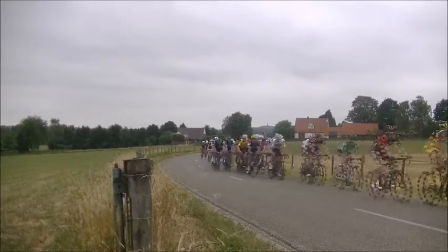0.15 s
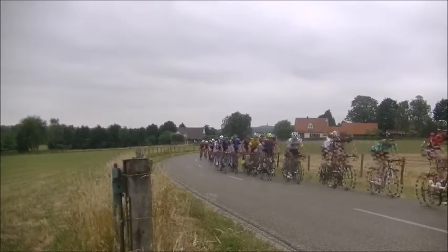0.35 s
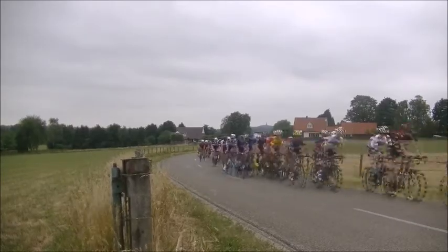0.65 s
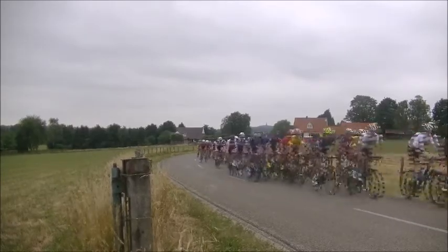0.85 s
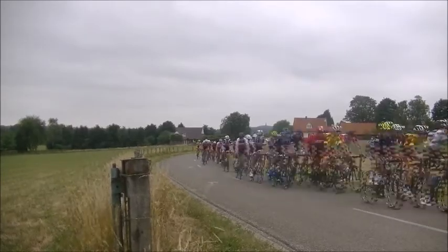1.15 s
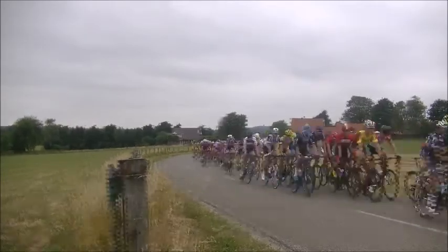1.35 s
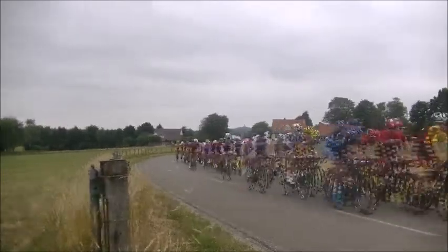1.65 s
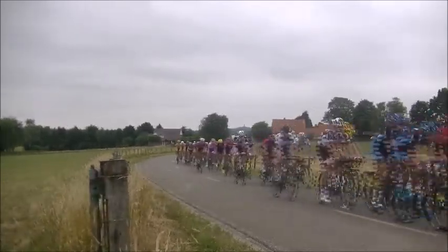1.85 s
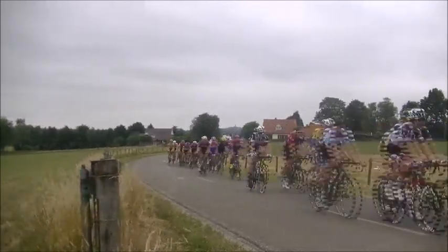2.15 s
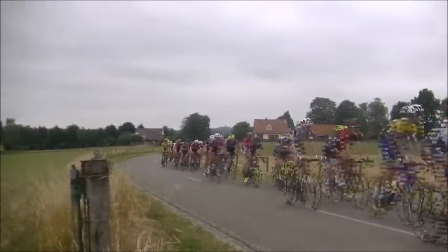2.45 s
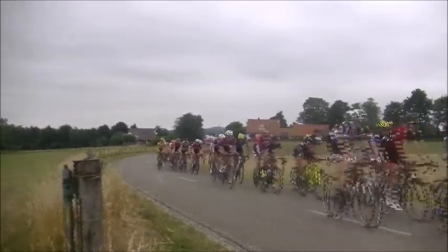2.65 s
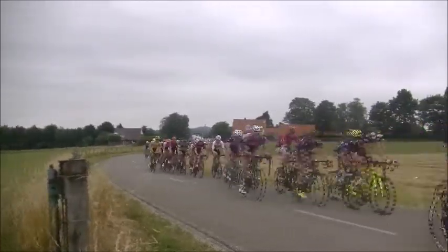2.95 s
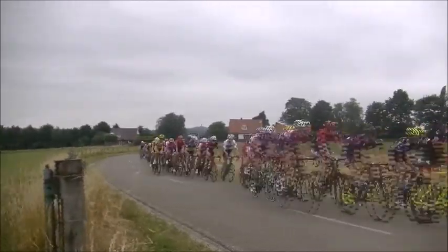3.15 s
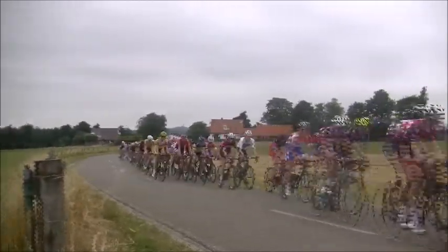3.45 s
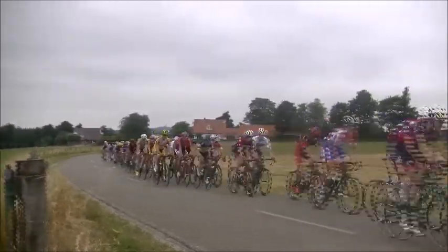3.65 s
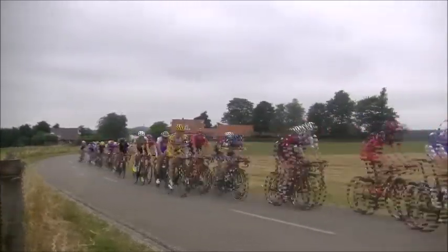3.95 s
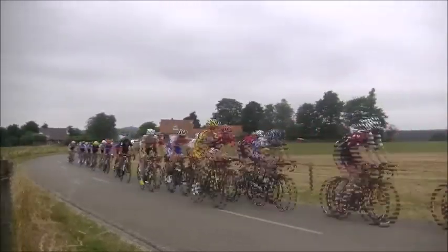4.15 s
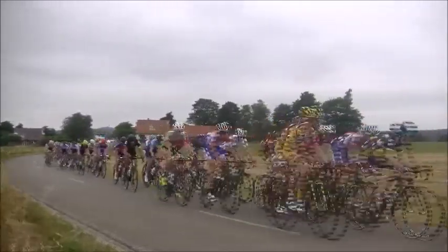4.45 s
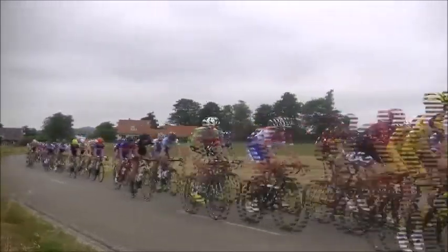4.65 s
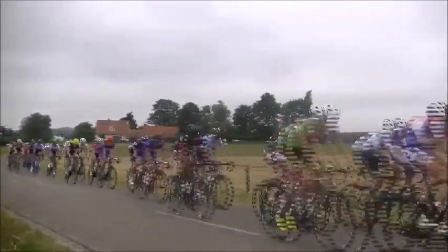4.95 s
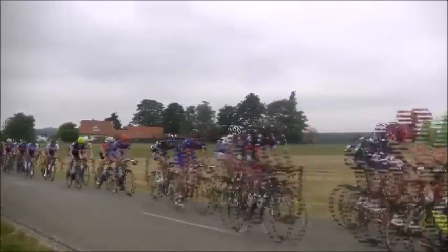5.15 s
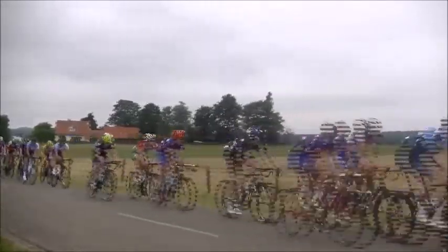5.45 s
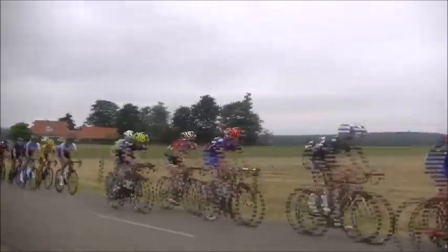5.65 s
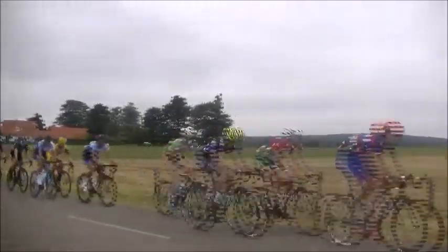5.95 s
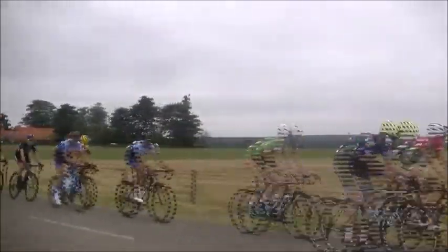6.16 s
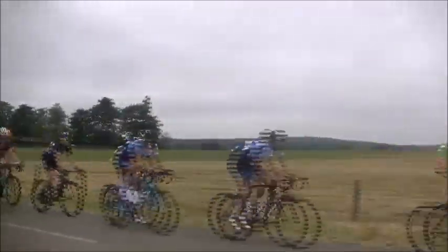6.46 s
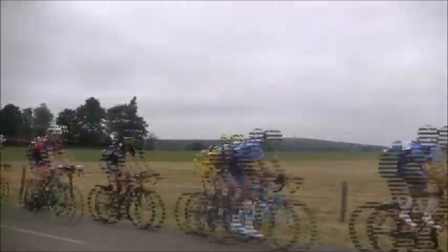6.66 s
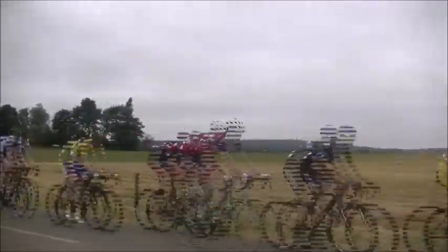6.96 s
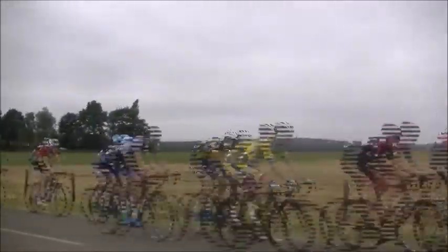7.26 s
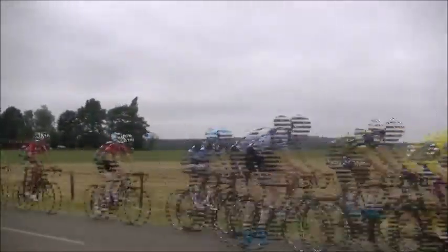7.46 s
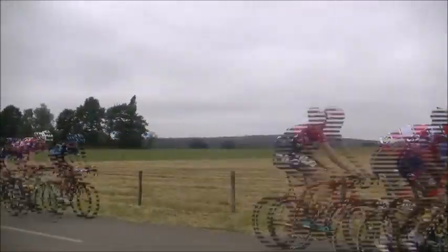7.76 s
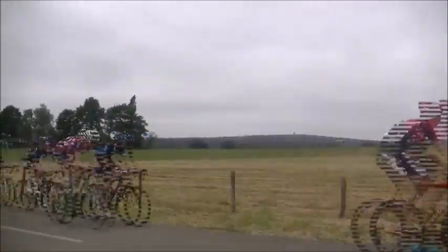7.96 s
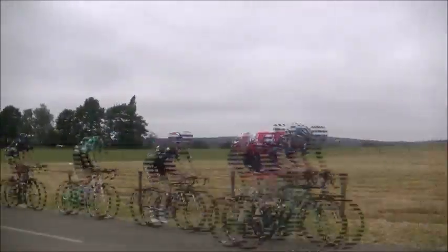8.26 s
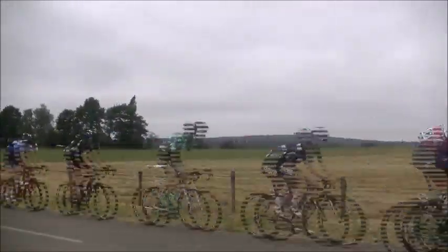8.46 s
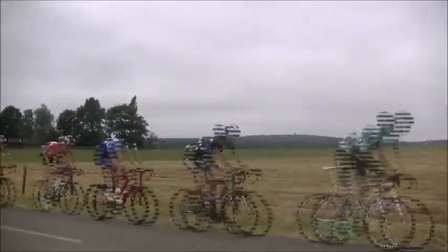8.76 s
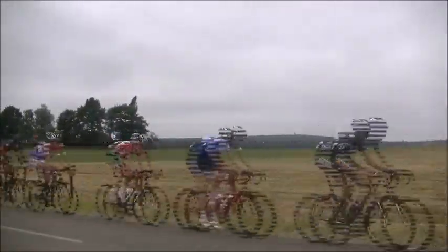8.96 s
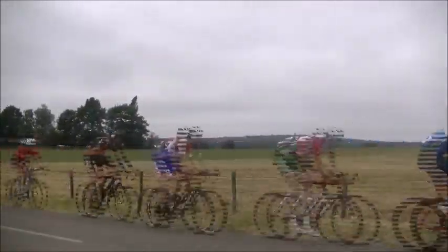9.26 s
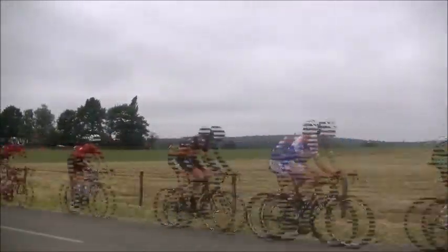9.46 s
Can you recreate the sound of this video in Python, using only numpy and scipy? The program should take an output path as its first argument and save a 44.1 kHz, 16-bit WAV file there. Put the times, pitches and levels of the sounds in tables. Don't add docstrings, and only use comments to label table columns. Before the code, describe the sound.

At an open country roadside, a large pack of racing bicycles rushes by in a continuous hiss of tyres and dense chain whirr. Hard gear clacks punctuate it early and midway. Later, fingers tap and rub the handheld camera, the sound cuts out briefly, a pebble pings, and the hiss carries on to the end.

```python
import sys
import numpy as np
from scipy import signal
from scipy.fft import rfft, irfft, next_fast_len
from scipy.io import wavfile
from scipy.ndimage import uniform_filter1d

SR = 44100
rng = np.random.default_rng(int(sys.argv[2]) if len(sys.argv) > 2 else 0)


def undo_db(level):
    steps = np.asarray(level, float) / 20
    return 10 ** steps


def wav_out(sig):
    wavfile.write(sys.argv[1], SR, np.round(np.clip(np.atleast_2d(sig).T, -1, 1) * 32767).astype(np.int16))


N = 423801
TIME, SIZE = np.arange(N) / SR, next_fast_len(N, True)
FREQ = np.arange(SIZE // 2 + 1) * SR / SIZE + 1e-3
TOP_HZ = 15830

# f/Hz, density/dB per Hz
CHAIN = [(1760, -13), (3000, -4.5), (3640, -4), (4560, -1), (5160, -4.5), (5550, -8), (5950, -16),
         (6450, -20), (7430, -14), (8250, -19), (8880, -25.5), (10600, -20.5), (11600, -25.5),
         (15300, -23.5)]
# t/s, tyre level at the kerb/dB, chain effort over tyres/dB, hum of hollow deep rims/dB
BUNCH = [(0, -30, -5.5, 0.5), (.3, -31, -6, 0), (1, -31.5, -4.5, -2), (1.5, -29.5, -4.5, -2.5),
         (2.02, -30.5, -3.5, 0.3), (2.6, -27.5, -4.5, -1.5), (3.3, -28.5, -4, 1.5), (3.9, -27, -4.5, 1),
         (4.6, -27.5, -6, 1.5), (5.3, -25.5, -7, 0.9), (5.9, -27.5, -5.5, 0), (6.4, -28, -5.5, -2),
         (6.75, -27.5, -6, -1), (7.53, -28.5, -6, -0.3), (7.9, -30, -4.5, 3.5), (8.15, -27, -9, 1),
         (8.9, -29.5, -7, -1.5), (9.6, -30, -5.5, -2.5)]


def along(table, hz):
    f, v = np.transpose(table)
    return np.interp(np.log(hz), np.log(np.maximum(f, 1)), v)


def curves(table):
    s, *columns = np.transpose(table)
    return [np.interp(TIME, s, c) for c in columns]


def unit(x):
    return x / np.sqrt(np.mean(x ** 2))


def shape(x, gain):
    return irfft(rfft(x, SIZE) * gain, SIZE)[..., :N]


def peak(hz, width_hz):
    return 1 / (1 + 1j * (FREQ / hz - hz / FREQ) * hz / width_hz)


def bell(s, half_s):
    return np.exp(-((TIME - s) / half_s) ** 2 / 2)


def walk(rate_hz):
    k = int(SR / rate_hz)
    steps = np.repeat(rng.standard_normal(N // k + 1), k)[:N]
    return unit(uniform_filter1d(uniform_filter1d(steps, k), k))


def ring(s, db, hz, t60_s, rise_s=0.00035):
    t = np.arange(int(t60_s * SR)) / SR
    envelope = undo_db(db - 60 * t / t60_s) * (1 - np.exp(-t / rise_s))
    return int(s * SR), envelope * np.sin(2 * np.pi * hz * t)


def add(out, at, x):
    out[..., at:at + x.shape[-1]] += x[..., :N - at]


def gritty(rate_hz, spread_db, share):
    size = undo_db(spread_db * np.minimum(rng.exponential(size=N), 3))
    ticks = (rng.random(N) < rate_hz / SR) * rng.choice([-1, 1], N) * size
    return unit(rng.standard_normal(N) + share * unit(ticks))


def ports(x):
    # f/Hz, share/0-1
    likeness = [(60, 0.98), (130, 0.07), (290, 0.63), (640, 0.98), (1410, 0.85), (3100, 1), (6820, 0.94),
                (15000, 1)]
    # f/Hz, level/dB
    lean_db = [(60, -4), (110, 5.5), (200, 2), (380, 3.5), (700, 2.5), (1290, -2), (2380, -3), (4400, 0),
               (8120, -0.5), (15000, 0.5)]
    # f/Hz, phase/rad
    lead_rad = [(0, -0.14), (340, -0.62), (860, -0.63), (3450, 0.43), (4910, -0.16), (5680, 0.33),
                (7670, -0.5), (8350, 0.0), (16100, -0.0)]
    like = np.clip(along(likeness, FREQ), 0, 1)
    shared = rfft(x, SIZE) * np.sqrt(1 + like)
    diffuse = rfft(rng.standard_normal(N), SIZE) * np.sqrt(1 - like)
    lean = undo_db(along(lean_db, FREQ) / 2)
    turn = np.exp(.5j * along(lead_rad, FREQ))
    return np.array([lean * (shared * turn + diffuse), (shared / turn - diffuse) / lean])


def patchy(spectra, lo_hz, hi_hz, swell_db, near_db, flicker_db):
    out, swell, octave = 0, walk(2.384), np.log2(FREQ)
    centres = np.arange(np.log2(lo_hz), np.log2(hi_hz) + .3, 1 / 3)
    surge = [walk(5) for _ in range(len(centres) // 3 + 2)]
    for k, centre in enumerate(centres):
        part = np.cos(np.pi / 2 * np.clip(3 * (octave - centre), -1, 1)) ** 2
        blend = k % 3 / 3
        near = surge[k // 3] * (1 - blend) + surge[k // 3 + 1] * blend
        level_db = swell_db * swell + near_db * near + flicker_db * walk(14)
        out = out + irfft(spectra * part, SIZE)[:, :N] * undo_db(level_db)
    return unit(out)


def hand():
    # t/s, peak/dB, f/Hz, t60/s
    knocks = [
        (6.964, -25, 224, 0.037),
        (7.068, -30, 330, 0.022),
        (7.284, -28, 330, 0.016),
        (7.359, -14, 332, 0.0091),
        (7.387, -27, 476, 0.019),
        (8.487, -25, 450, .025),
    ]
    # t/s, peak/dB, f/Hz, t60/s
    strap = [
        (6.925, -32.5, 182, 0.17),
        (6.969, -29, 154, 0.28),
        (6.968, -40, 170, .2),
    ]
    # t/s, peak/dB, f/Hz
    slips = [(6.966, -26, 403), (7.063, -21, 330), (7.458, -23, 350), (7.49, -18.5, 435), (8.319, -27, 330),
             (8.43, -22, 420), (8.459, -24, 400), (8.499, -30, 350), (8.525, -32, 300), (8.585, -27, 330),
             (8.637, -18, 352), (8.658, -18, 350), (8.734, -30, 380), (8.755, -18, 350), (8.793, -19, 330),
             (8.871, -16, 370), (8.903, -17, 400), (8.928, -25, 400), (9.085, -26, 417), (9.409, -20, 398),
             (9.501, -24, 377), (9.572, -21, 450), (9.6, -20, 400)]
    # t of firmest press/s, level/dB
    strokes = [(6.98, -39), (7.47, -30), (8.04, -40), (8.24, -39), (8.45, -28), (8.52, -31), (8.64, -25.5),
               (8.76, -30), (8.89, -26), (9.09, -34), (9.16, -36), (9.52, -33)]
    press_db_per_s, lift_db_per_s = 222, 201
    overtone, overtone_db = 1.75, -5
    taps, rocks = np.zeros((2, N))
    for s, db, hz, t60_s in knocks:
        add(taps, *ring(s, db + 2.0, hz, max(t60_s, .01), rise_s=0.0014))
    for s, db, hz, t60_s in strap:
        add(taps, *ring(s, db, hz, t60_s, rise_s=0.0023))
    for s, db, hz in slips:
        add(rocks, *ring(s, db + 8.0, hz, 0.024, rise_s=0.0023))
        add(rocks, *ring(s, db + 8.5 + overtone_db, hz * overtone, 0.018, rise_s=.0015))
    press = 0
    for s, db in strokes:
        fall_db = np.maximum(press_db_per_s * (s - TIME), lift_db_per_s * (TIME - s))
        press = press + undo_db(db - fall_db)
    rub_gain = peak(318, 370) ** 2 / (1 + 110 / (1j * FREQ)) ** 2
    rocks += unit(shape(gritty(120, 4.1, 1.2), rub_gain)) * press
    rocking = np.array([[1], [-.4]])
    stiff = 1 / (1 + 140 / (1j * FREQ)) ** 2
    return shape(taps * undo_db(3.0) + rocking * rocks, stiff)


def scuffs():
    # t/s, half length/s, f/Hz, width/Hz, level/dB
    brushes = [
        (1.844, 0.055, 5040, 1300, -29.5),
        (1.08, .06, 4600, 1100, -36),
        (8.752, 0.0068, 6000, 1500, -35),
        (.12, 0.1, 2020, 150, -34),
        (4.24, .03, 3900, 1700, -33),
        (4.2, 0.011, 7800, 2500, -37),
        (6.969, .0025, 5600, 1200, -32),
        (7.36, .003, 5400, 1800, -30),
        (7.386, .0025, 5800, 1400, -30),
    ]
    out, hiss = 0, rng.standard_normal(N)
    for s, half_s, hz, width_hz, db in brushes:
        out = out + unit(shape(hiss, peak(hz, width_hz) ** 2)) * undo_db(db) * bell(s, half_s)
    return out


def clacks():
    # t/s, clink peak/dB, treble share/dB
    small_clacks = [(0.2508, -17, -22), (1.299, -17, -24.5), (1.4711, -16, -24), (1.6084, -17, -16.5),
                    (2.3244, -21, -14), (3.2864, -21, -12), (3.7084, -21, -7), (3.9484, -18, -10.5),
                    (4.2048, -13, -25), (4.2194, -19, -22), (4.257, -8.5, -29.5), (4.2794, -17, -24),
                    (4.5164, -19.5, -7.5), (4.534, -22, -11), (4.6205, -14, -23), (4.7247, -14, -25.5),
                    (4.895, -9, -29), (5.2734, -16.5, -20), (6.733, -15, -18), (6.9666, -15, -12.5),
                    (6.9884, -24, -20.5), (7.0344, -25, -14), (7.3578, -12.5, -14), (7.3836, -16, -15.5),
                    (7.4116, -21.5, -15.5), (7.456, -15, -24.5), (8.009, -18, -15), (8.6514, -26, -18.5),
                    (8.7454, -18, -21), (9.08, -10.5, -18.5)]
    # t/s, clink peak/dB, hollow share/dB, treble share/dB, t60/s
    big_clacks = [
        (1.3082, -4.5, 4.5, -21, .045),
        (1.3115, -15, 0, -13.5, 0.032),
        (1.321, -25, -1.5, -25, .12),
        (8.2214, -8, -10, -9, 0.0084),
    ]
    # f/Hz, width/Hz
    clack_modes = [(2250, 980), (4500, 1270)]
    # f/Hz, peak/dB, t60/s
    pebble = [(2820, 2, 0.0065), (3300, 0, .007), (4500, 0.5, 0.013), (4900, -6, .007), (7400, -9, 0.0046)]
    pebble_s, small_hollow_db, small_t60_s = 8.2215, -1, 0.025
    hollow, clink, snap, ping = np.zeros((4, N))
    t = np.arange(4000) / SR
    small = [(s, db, small_hollow_db, treble_db, small_t60_s) for s, db, treble_db in small_clacks]
    for s, db, hollow_db, treble_db, t60_s in [*big_clacks, *small]:
        fade = undo_db(db - 60 * t / max(t60_s, .004)) * (1 - np.exp(-t / 0.00051))
        burst = rng.choice([-1, 1], len(t)) * fade
        add(clink, int(s * SR), burst)
        add(hollow, int(s * SR), burst * undo_db(hollow_db))
        add(snap, int(s * SR), burst * undo_db(treble_db))
    for hz, db, t60_s in pebble:
        add(ping, *ring(pebble_s, db, hz, t60_s))
    low, high = (peak(hz, width_hz) ** 2 * undo_db(7.5) for hz, width_hz in clack_modes)
    bright = undo_db(along(CHAIN, FREQ) + 30.0) * (6000 / FREQ) ** 0.78
    bright = bright * np.clip((FREQ - 5400) / 1500, 0, 1) * (FREQ < TOP_HZ)
    ping_cut = 1 / (1 + 600 / (1j * FREQ)) ** 2
    return shape(hollow, low) + shape(clink, high) + shape(snap, bright) + shape(ping, ping_cut)


def drivetrains():
    # t of passing/s, lift/dB, half length/s
    coasters = [(.05, 0.5, .1), (1.8, 0.5, 0.13), (2.4, 2.5, 0.13), (2.75, 1.5, 0.091), (3.4, 2, 0.22),
                (3.87, 2.5, 0.13), (4.2, 0.5, 0.11), (5.55, 1, 0.42), (6.3, 0.8, 0.13), (6.98, 2, .1),
                (7.4, 2.5, 0.18), (7.95, 3.5, 0.077), (8.18, 3.5, 0.16), (8.7, 3, 0.1), (9.3, 1.5, 0.067)]
    whirr_db, sizzle_db, air_db = 3.5, -10.5, -16.5
    sizzle_share, air_share = 0.7, 1
    spectra = ports(gritty(500, 2.9, 0.53)) * undo_db(along(CHAIN, FREQ)) * (FREQ < TOP_HZ)
    first = np.clip((6500 - FREQ) / 600, 0, 1)
    last = np.clip((FREQ - 8800) / 800, 0, 1)
    hiss_db, effort_db, _ = curves(BUNCH)
    chain_db = hiss_db + effort_db
    lift_db = sum(db * bell(s, half_s) for s, db, half_s in coasters)
    whirr = patchy(spectra * np.sqrt(first), 2430, 7000, 0.24, 0.45, 0.92)
    sizzle = patchy(spectra * np.sqrt(1 - first - last), 5500, 10000, 0.77, 0.67, 0.54)
    air = patchy(spectra * np.sqrt(last), 8000, 16000, .4, .5, .8)
    whirr = whirr * undo_db(chain_db + whirr_db)
    sizzle = sizzle * undo_db(chain_db + sizzle_db + sizzle_share * lift_db)
    air = air * undo_db(chain_db + air_db + air_share * lift_db)
    chatter = undo_db(1.0 * walk(190))
    return whirr + (sizzle + air) * chatter


def tyres():
    # f/Hz, density/dB per Hz
    tread = [(18, -82), (30, -39), (124, -46.5), (277, -22), (367, -21), (526, -12.5), (656, -11.5),
             (851, -3), (941, -6), (1170, -5), (1350, -2.5), (2050, -1.5), (2670, -4), (3600, -12),
             (4680, -18), (7920, -120)]
    hiss_db, _, hum_db = curves(BUNCH)
    pan_db = -2.5 + 0.13 * TIME
    drone_db = -0.32 * (hiss_db + 26.5)
    spectra = ports(gritty(900, 2.0, 0.35)) * undo_db(along(tread, FREQ))
    rolling = patchy(spectra, 25.1, 5000, 0.38, 0.45, 0.42)
    drone = shape(rolling, np.clip((1250 - FREQ) / 200, 0, 1))
    hum = shape(rolling, np.clip((1850 - FREQ) / 200, 0, 1)) - drone
    rolling = rolling + drone * (undo_db(drone_db) - 1) + hum * (undo_db(hum_db) - 1)
    return rolling * undo_db(hiss_db + 2.0) * undo_db(np.array([pan_db + 5.0, -pan_db + 1.3]) / 2)


def scene():
    clack_pan = np.array([[1.06], [.94]])
    return hand() + scuffs() + clacks() * clack_pan + drivetrains() + tyres()


def roll_off(x):
    return signal.sosfilt(signal.butter(12, 16500, fs=SR, output="sos"), x)


def record(dry):
    dropout_s = 7.5546, 7.8855
    bass_cut = signal.butter(1, 90, "high", fs=SR, output="sos")
    kept = (TIME < dropout_s[0]) | (TIME > dropout_s[1])
    mix = signal.sosfilt(bass_cut, np.clip(dry, -1, 1)) * kept
    return roll_off(mix)


dry = scene()
out = record(dry)
wav_out(out)
```